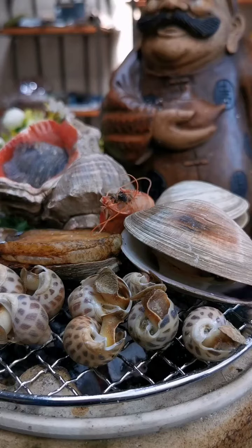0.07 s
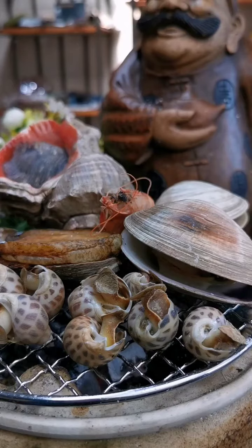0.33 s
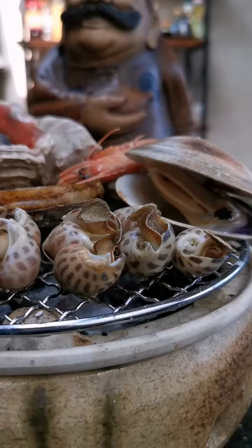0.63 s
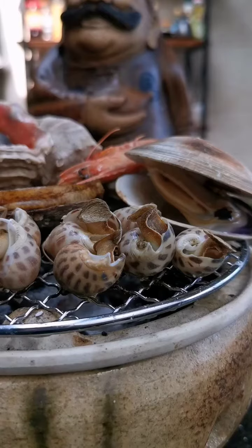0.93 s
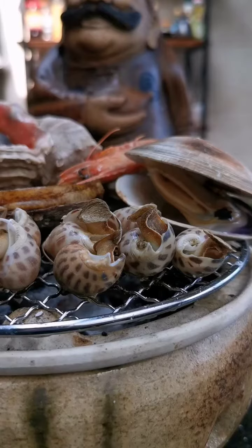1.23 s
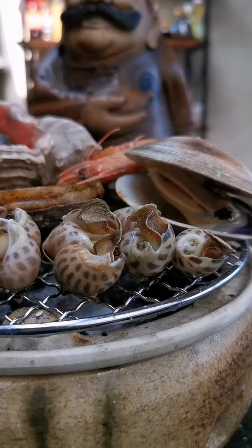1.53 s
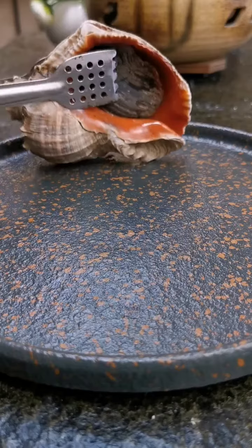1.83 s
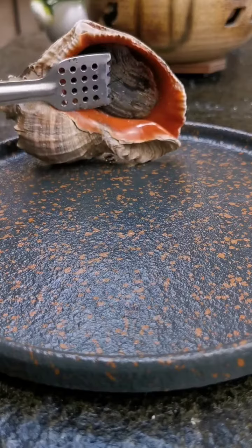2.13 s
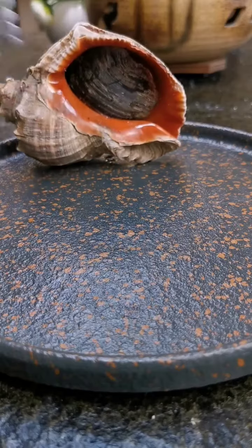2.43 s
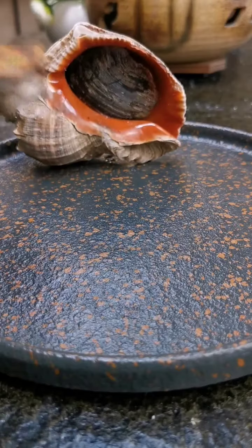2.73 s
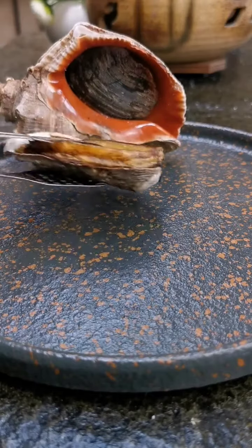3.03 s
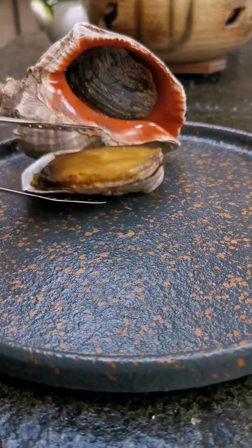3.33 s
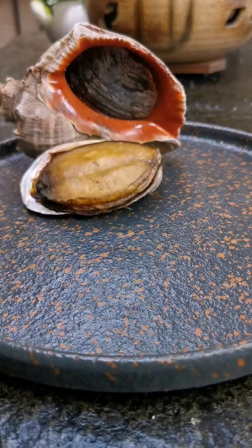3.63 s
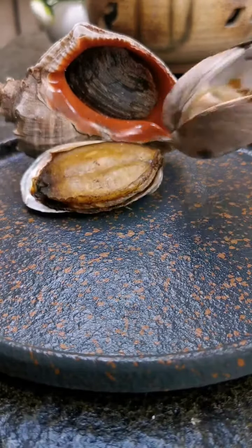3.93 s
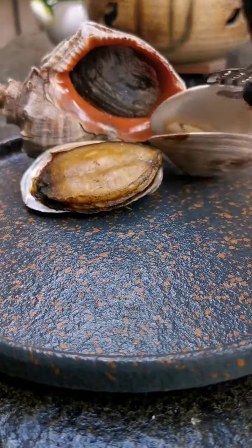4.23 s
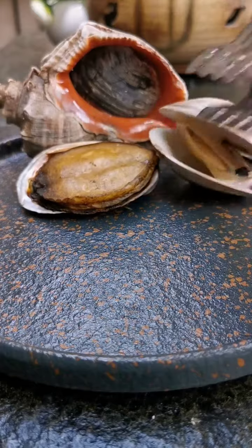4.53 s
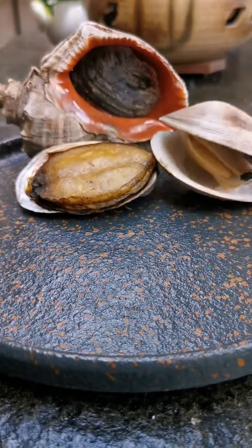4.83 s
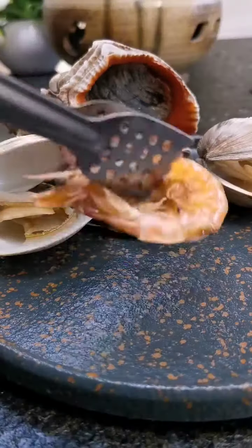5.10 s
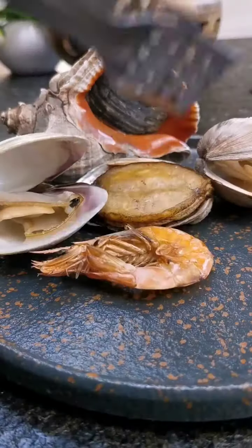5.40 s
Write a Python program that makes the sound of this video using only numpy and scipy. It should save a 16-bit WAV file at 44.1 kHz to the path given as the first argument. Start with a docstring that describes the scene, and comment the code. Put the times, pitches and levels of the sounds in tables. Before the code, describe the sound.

Seashells clack, ring and scrape on a stoneware plate as steel tongs serve shellfish, ending with a prawn's small wet crunch.

```python
"""In a hard-walled yard, steel tongs serve grilled shellfish onto a stoneware plate, heard from close by.
After a faint sizzle and a pop from the grill, a whelk, an abalone and clams clack down, ring, rock and
scrape; a prawn lands wetly. Impacts excite the damped modes of shell and plate, sliding contacts rasp by
stick-slip friction, and the yard echoes and booms. The sound fades out briefly between the servings."""
import sys
import numpy as np
from scipy import signal
from scipy.fft import rfft, irfft, next_fast_len
from scipy.io import wavfile
from scipy.ndimage import map_coordinates

SR = 44100
rng = np.random.default_rng(int(sys.argv[2]) if len(sys.argv) > 2 else 0)


def to_wav(sig):
    """Store sig (one row per channel, or 1-D mono) as 16-bit WAV at the path in sys.argv[1].

    Samples outside -1..1 are clipped; the rate is SR.
    """
    pcm = np.clip(np.atleast_2d(sig), -1, 1) * 32767
    pcm = np.round(pcm).astype(np.int16)
    wavfile.write(sys.argv[1], SR, pcm.T)  # frames by channels


N = 249606

# Sharp clacks. Each row: start in seconds, relative level in dB, kind of clack.
# The last two "whelk" rows are wall echoes of its crash. A "held" shell is damped by the tongs.
# The first "tip" is a shell popping on the grill; the others are ticks of the tongs' steel edge.
CONTACTS = [(.2754, -30.5, "tip"), (1.7212, -5.5, "whelk"), (1.7264, -5, "whelk"), (1.731, -4, "whelk"),
            (1.7345, -6.5, "whelk"), (1.7624, -18, "whelk"), (1.8043, -20.5, "whelk"),
            (2.0005, -25, "whelk spine"), (2.1265, -18.5, "whelk spine"), (2.2958, -37, "tip"),
            (2.4825, -26, "tongs"), (3.2301, -4, "abalone"), (3.2786, -18, "held"), (3.2904, -19.5, "held"),
            (3.3255, -16.5, "held"), (3.3342, -13, "held"), (3.3478, -5.5, "abalone"),
            (3.4195, -16.5, "held"), (3.42, -14, "abalone rim"), (3.595, -22.5, "tip"),
            (3.655, -31, "abalone rim"), (3.689, -39.5, "held"), (3.7349, -13.5, "abalone rim"),
            (3.8661, -13.5, "abalone rim"), (4.0875, -5, "clam lid"), (4.1918, -2, "clam cup"),
            (4.4982, -18, "clam rib"), (4.508, -11.5, "tip"), (4.528, -22, "clam rib"), (4.592, -15, "tip"),
            (4.615, -24.5, "clam rib"), (4.6385, -16, "clam rib")]
# Dull, hollow sounds. Each row: start in seconds, relative level in dB, the food they belong to.
# The "clam" rows are the yard's bloom after the lid's clack; the others are knocks of the food itself.
KNOCKS = [(2.0005, -28, "whelk"), (2.011, -24, "whelk"), (2.045, -29.5, "whelk"), (2.127, -27.5, "whelk"),
          (2.5335, -28.5, "whelk"), (3.595, -32, "abalone"), (3.807, -36.5, "abalone"), (4.11, -29, "clam"),
          (4.129, -26.5, "clam"), (5.354, -33, "prawn")]
# Booms of the yard after heavy landings. Each row: start in seconds, relative level in dB, what landed.
BOOMS = [(1.76, -33.5, "whelk"), (2.001, -42, "whelk"), (2.533, -48, "whelk"), (4.223, -44, "clam"),
         (5.36, -50, "prawn")]
# Modes of the plate and low resonances of the yard.
# Each row: frequency in Hz, relative level in dB, T60 in seconds.
PLATE_MODES = [(405, -11, .55), (425, -11, .6), (473, -11, .6), (598, -7, .7), (731, -15, .6),
               (862, -15, .5), (1432, -12, .36), (2241, 1, .5), (2349, -2, .4), (2448, 1, .58),
               (2938, -7, .45), (4123, 3, .38), (4576, -4, .28), (4601, -9, .4), (5779, -19, .45),
               (6352, -10, .4), (7870, -19, .2), (8872, -8, .4), (10330, -24, .44)]
YARD_MODES = [(81.36, -9, 1.0), (126.6, -8.5, 0.68), (166.6, -4, 1), (212.96, 2.5, 0.72), (240.5, -2, 0.6)]
def whelk():
    """Impact excitation: the whelk crashes down and tips over; the plate rings, the yard answers."""
    crash_and_echoes, spines = rows(CONTACTS, "whelk"), rows(CONTACTS, "whelk spine")
    landing, tumbles, booms = crash_and_echoes[:1], rows(KNOCKS, "whelk"), rows(BOOMS, "whelk")
    return (clacks(crash_and_echoes, bands_db=(-8, -6.5, -9, -34.5), room_db=-6.5, left_db=1)
            + rings(landing, PLATE_MODES, ring_db=-18.5, room_db=0, left_db=-0.5, flutter_db=5)
            + rings(tumbles, PLATE_MODES, ring_db=-24.5, room_db=-17, left_db=1, flutter_db=4.5)
            + clacks(spines, bands_db=(3, -20, -29.5, -35.5), room_db=-18, left_db=6.5)
            + knocks(tumbles, t60=0.32, octave_db=-4, left_db=0.3, room_db=-17.5)
            + rings(booms, YARD_MODES, ring_db=3.5, room_db=-8, left_db=1, octave_db=-6))


# Modes of the abalone shell. Each row: frequency in Hz, relative level in dB, T60 in seconds.
ABALONE_MODES = [(938, 14, 0.013), (1657, 5, 0.045), (1574, -9.5, .3), (2993, 17, 0.032),
                 (4608, 11.5, 0.079), (4680, 1, 0.053), (7140, -19.5, 0.14)]
def abalone():
    """Free vibration of a thin shell: the abalone cracks down twice, then settles with lighter taps."""
    blows, taps = rows(CONTACTS, "abalone"), rows(CONTACTS, "abalone rim")
    return (clacks(blows, bands_db=(-14, -7.5, -8, -24.5), room_db=-4, left_db=2.5)
            + clacks(taps, bands_db=(-16, -8.5, -15.5, -30), room_db=-0.5, left_db=2)
            + rings(blows + taps, ABALONE_MODES, ring_db=-15, room_db=-19, left_db=2, scatter_db=1.6)
            + knocks(rows(KNOCKS, "abalone"), t60=0.064, octave_db=10, left_db=1.7, room_db=-11.5))


# Modes of the clam struck on its lid, its cup and its ribs.
# Each row: frequency in Hz, relative level in dB, T60 in seconds.
LID_MODES = [(1465, -2.5, 0.023), (2170, 5.5, 0.019), (3144, -20, 0.1), (4100, 4, 0.029), (4160, -8, 0.17),
             (10160, -16.5, 0.17), (10740, -19, 0.19)]
CUP_MODES = [(1566, 7.5, 0.025), (2364, -3.5, 0.049), (2964, 10, 0.016), (3910, -13.5, 0.071),
             (4586, 0.5, 0.035), (5771, -15, 0.072)]
RIB_MODES = [(436.7, 0, 0.12), (500, -6.5, 0.13), (609, -9.5, 0.1), (843, 5, 0.051), (1628, 6.5, 0.023),
             (2440, -9, 0.17), (2970, 1.5, 0.022), (4000, -12, 0.097)]
def clam():
    """The point of impact selects the modes: the open clam lands on lid, then cup, then rocks on ribs."""
    lid, cup = rows(CONTACTS, "clam lid"), rows(CONTACTS, "clam cup")
    ribs, yard_bloom = rows(CONTACTS, "clam rib") + rocking(), rows(KNOCKS, "clam")
    return (clacks(lid, bands_db=(-20, -9, -16, -28), room_db=-5.5, left_db=-2.5)
            + rings(lid, LID_MODES, ring_db=-9.5, room_db=-17, left_db=1, scatter_db=6.6)
            + clacks(cup, bands_db=(-26.5, -6, -7, -24.5), room_db=-13, left_db=1.5)
            + rings(cup, CUP_MODES, ring_db=-11.5, room_db=-12.5, left_db=5, scatter_db=4.2)
            + rings(cup, PLATE_MODES, ring_db=-31, room_db=-3, left_db=0, octave_db=-3, flutter_db=3)
            + clacks(ribs, bands_db=(-7, -7.5, -18.5, -30), room_db=-9.5, left_db=2.5)
            + rings(ribs, RIB_MODES, ring_db=-7, room_db=-11, left_db=2, scatter_db=1.2)
            + knocks(yard_bloom, t60=0.29, octave_db=1, left_db=1.8, room_db=-7.5)
            + rings(rows(BOOMS, "clam"), YARD_MODES, ring_db=3, room_db=-8, left_db=3.5, octave_db=2.5))


def rocking(start_s=4.7165, first_swing_s=0.0315, shrink=0.69, count=4, db=-26):
    """Damped rocking: the intervals between rib contacts shrink in geometric progression."""
    swings = first_swing_s * shrink ** np.arange(count)
    return [(s, db) for s in start_s + np.cumsum(swings) - swings]


# Swells of rough noise. Each row: start in seconds, length in seconds, relative level in dB, texture.
# Two are reverberation: a faint hiss after a tick (3.608 s) and a wash after the clam's clack (4.222 s).
# The others are strokes over the glaze or a shell.
RASPS = [(.268, .032, -45.5, "shell"), (2.286, .087, -40.5, "steel"), (2.312, 0.044, -42.5, "ridges"),
         (2.343, 0.014, -34, "ridges"), (2.475, 0.019, -38, "steel"), (3.26, .08, -33, "shell"),
         (3.417, .15, -37.5, "shell"), (3.5, 0.12, -32, "steel"), (3.608, .15, -43.5, "shell"),
         (4.222, .11, -41.5, "ridges"), (4.412, 0.036, -39, "shell"), (4.505, 0.078, -33, "steel"),
         (5.46, 0.11, -49, "flesh")]
def tongs():
    """Friction and impact: tongs grip, tick and drag; with them come a grill pop and two reverb tails."""
    pop_and_ticks = rows(CONTACTS, "tip")
    rasps_and_wash, drags_and_hiss = rows(RASPS, "ridges"), rows(RASPS, "shell")
    return (clacks(rows(CONTACTS, "held"), bands_db=(-2, 2, -4.5, -20.5), room_db=-21.5, left_db=3)
            + clacks(pop_and_ticks, bands_db=(-18, -12.5, -11.5, -10.5), room_db=-15, left_db=1)
            + plate_ping()
            + rasps(rows(RASPS, "steel"), bands_db=(-14, -8, 3.5, -5), room_db=-8.5)
            + rasps(rasps_and_wash, bands_db=(-22.5, -3, 6, -20.5), room_db=-8.5)
            + rasps(drags_and_hiss, bands_db=(4, -6, -3.5, -7), room_db=-1.5))


# High modes of the plate. Each row: frequency in Hz, relative level in dB, T60 in seconds.
HIGH_PLATE_MODES = [(2220, -13, 0.39), (2900, -12, 0.18), (4560, 1, 0.14), (5820, -4, 0.17),
                    (7830, -6, 0.091), (8800, -13.5, 0.2), (9980, -10.5, 0.27), (12060, -12, 0.12)]
def plate_ping():
    """Free vibration: a click, and a bright, high ring of the plate."""
    click = rows(CONTACTS, "tongs")
    return (clacks(click, bands_db=(-0.5, -19, -23, -14.5), room_db=2, left_db=5.5)
            + rings(click, HIGH_PLATE_MODES, ring_db=-1, room_db=-22, left_db=1.5, scatter_db=2.5))


def prawn():
    """Soft, damped impact: the prawn lands in a wet crunch, plops and squelches as it settles."""
    crunch = crunches(room_db=-15.5)
    squelch = rasps(rows(RASPS, "flesh"), bands_db=(-27, -0.5, -4.5, -26), room_db=-17, grit_db=9.5)
    plop = knocks(rows(KNOCKS, "prawn"), t60=0.059, octave_db=8.5, left_db=1, room_db=-12)
    boom = rings(rows(BOOMS, "prawn"), YARD_MODES, ring_db=-4, room_db=-34, left_db=1.5, octave_db=6)
    return crunch + squelch + plop + boom


# Bursts of wet cracks. Each row: start in seconds, relative level in dB, T60 in seconds.
CRUNCHES = [(5.277, -46, 0.044), (5.303, -41, 0.25), (5.3272, -22, .025), (5.340, -22, 0.083),
            (5.3455, -13, 0.01), (5.349, -30, 0.18)]
# Spectrum of the cracks. Each row: frequency in Hz, relative level in dB.
CRUNCH_SPECTRUM = [(200, -15.5), (450, -15.5), (900, -9.5), (1500, -11.5), (2400, 0), (4000, -5.5),
                   (4800, 2), (6200, -4.5), (8200, -8.5), (12000, -13.5), (16000, -21.5)]
def crunches(room_db, cracks_per_s=3000):
    """Shot noise: the prawn's legs and thin shell crumple in decaying showers of tiny random cracks."""
    out, t = np.zeros((2, N)), clock(0.17)
    for s, db, t60 in CRUNCHES:
        cracks = unit((rng.random((3, len(t))) < cracks_per_s / SR) * rng.standard_normal((3, len(t))))
        envelope = amp(-60 * t / t60)
        shower = unit(cracks * envelope) * np.sqrt(np.mean(envelope ** 2))
        force = stereo(shower[0], shower[1:], spread=0.74)
        burst = coloured(force, lambda hz: along(CRUNCH_SPECTRUM, hz) + 7)
        add(out, s, with_room(amp(db) * burst, room_db))
    return out


# Spectrum common to clacks and rasps. Each row: frequency in Hz, relative level in dB.
CONTACT_SPECTRUM = [(40, -39.5), (200, -23), (450, -11), (800, 2), (1250, -5.5), (2000, -1), (3000, 3.5),
                    (3600, -4.5), (4600, -2), (5600, -7.5), (8000, -3), (11000, -6.5), (16000, -17)]
def contact_colour(bands_db):
    """Each contact point favours other resonances: a dB curve weighted in four bands, randomly rippled."""
    knock, clack, edge, tick = bands_db
    weights = [(700, knock + 10), (1600, clack + 8.5), (4800, edge + 5), (8000, tick + 6)]
    spot_db = np.minimum(4.5 * rng.standard_normal(SR // 100), 3)  # notches, but no peak that would ping

    def curve(hz):
        ripple = map_coordinates(spot_db, [hz / 260], mode="mirror") * np.minimum(hz / 4000, 1)
        return along(CONTACT_SPECTRUM, hz) + along(weights, hz) + ripple
    return curve


def impact_force(t, t60, push_db, chatter_db, spread):
    """Transient excitation: one impulse, then a chatter of exponentially decaying noise."""
    chatter = rng.standard_normal((3, len(t))) * amp(-60 * t / t60)
    chatter *= amp(chatter_db) / np.linalg.norm(chatter, axis=1, keepdims=True)
    return stereo(amp(push_db) * (t == 0)) + stereo(chatter[0], chatter[1:], spread)


def clacks(blows, bands_db, room_db, left_db):
    """Source and filter: a brief, sharp excitation takes on the colour of shell or steel."""
    out, t = np.zeros((2, N)), clock(0.1)
    for s, db in blows:
        force = impact_force(t, t60=0.028, push_db=-3, chatter_db=-5, spread=1)
        hit = 20 * amp(db) * coloured(force, contact_colour(bands_db))
        add(out, s, with_room(panned(hit, left_db), room_db))
    return out


# Hollow resonances. Each row: frequency in Hz, bandwidth in Hz, relative level in dB.
HOLLOW_RESONANCES = [(430, 70, 7), (538, 9.6, 6.5), (743, 26, 2.5), (796, 94, 0.5), (1022, 53, 2),
                     (1566, 130, -10)]
def knocks(blows, t60, octave_db, left_db, room_db):
    """Resonant filtering: a push and its rumble sound through hollow resonances, with a spectral tilt."""
    def body_db(hz):
        power = sum(amp(db) ** 2 * (hz * width) ** 2 / ((centre ** 2 - hz ** 2) ** 2 + (hz * width) ** 2)
                    for centre, width, db in HOLLOW_RESONANCES)
        power /= 1 + (hz / 2000) ** 4  # low-pass
        return 10 * np.log10(1e-7 + power) + octave_db * np.log2(np.clip(hz, 200, 1600) / 600)

    out, t = np.zeros((2, N)), clock(0.42)
    for s, db in blows:
        knock = coloured(impact_force(t, t60, push_db=-4, chatter_db=0, spread=0.19), body_db)
        knock *= amp(db) / np.sqrt(np.mean(knock[:, t < 0.015] ** 2))  # the onset sets the level
        add(out, s, with_room(panned(knock, left_db), room_db))
    return out


def rings(blows, modes, ring_db, room_db, left_db, octave_db=0, scatter_db=3, flutter_db=0):
    """Modal superposition: each blow starts damped sinusoids that radiate unequally to left and right."""
    out, t = np.zeros((2, N)), clock(0.79)
    rattles = t[::SR // 140]  # a loose shell touches 140 times a second, making the modes flutter
    arrival = t - np.array([[0], [LEFT_LEAD_SAMPLES / SR]])
    attack = 1 - np.exp(-t / 0.00099)
    for s, db in blows:
        ring = np.zeros((2, len(t)))
        for hz, mode_db, t60 in modes:
            chance = rng.standard_normal((2, 2))  # a phase and a level for each channel
            phase = 2 * np.pi * hz * arrival + chance[:, :1] * min(hz / 6000, 1)
            tilt_db = octave_db * np.log2(hz / modes[0][0])
            level_db = db + ring_db + mode_db + tilt_db + scatter_db * chance[:, 1:]
            flutter = flutter_db * np.interp(t, rattles, rng.standard_normal(len(rattles)))
            ring += amp(level_db + flutter - 60 * t / t60) * np.sin(phase)
        add(out, s, with_room(panned(ring * attack, left_db), room_db))
    return out


def rasps(swells, bands_db, room_db, grit_db=3.5, grains_per_s=700):
    """Amplitude modulation: noise swells in uneven grains, as in stick-slip friction or a rough echo."""
    out = np.zeros((2, N))
    for s, length, db in swells:
        t = clock(length)
        grains = rng.standard_normal(SR // 50)
        grit = amp(grit_db * np.interp(t, np.arange(len(grains)) / grains_per_s, grains))
        swell = np.abs(np.sin(np.pi * t / length)) ** 0.5
        noise = unit(rng.standard_normal((3, len(t))) * grit * swell)
        rough = np.pad(stereo(noise[0], noise[1:], spread=0.87), ((0, 0), (0, SR // 100)))
        add(out, s, with_room(amp(db) * coloured(rough, contact_colour(bands_db)), room_db))
    return out


# Likeness of the two channels in the yard. Each row: frequency in Hz, correlation from -1 to 1.
COHERENCE = [(60, 0.93), (290, 0.89), (640, 0.41), (1410, -0.14), (7000, -0.0068)]
def mid_side_gains(hz):
    """Spatial coherence: the ratio of mid to side makes a diffuse field nearly mono in the bass."""
    angle = np.arccos(np.clip(along(COHERENCE, hz), -1, 1)) / 2
    return np.array([np.cos(angle), np.sin(angle)])


# Reverberation of the yard. Each row: frequency in Hz, T60 in seconds.
YARD_T60 = [(100, 1.0), (500, 0.81), (2500, 0.52), (5000, 0.6), (10000, 0.58), (16000, 0.69)]
def with_room(x, room_db, wall_delay_s=0.031, early_db=-13):
    """Reverberation by convolution: thin early scatter, then the full decaying tail from the walls."""
    hz, t, spectra = signal.stft(rng.standard_normal((2, SR)), SR, nperseg=256)
    decay = amp(-60 * t / along(YARD_T60, hz)[:, None])
    mid, side = signal.istft(spectra * decay * mid_side_gains(hz)[..., None], SR, nperseg=256)[1]
    early = np.arange(len(mid)) / SR < wall_delay_s
    tail = np.array([mid + side, mid - side]) * np.where(early, amp(early_db), 1)
    wet = signal.fftconvolve(x[:1], tail / np.linalg.norm(tail[0]), axes=1) * amp(room_db)
    wet[:, :x.shape[1]] += x
    return wet


def air(spectrum, db, crackle_db, pops_per_s=40):
    """Stationary noise: a wide steady hiss, with random pops of juice in the treble."""
    hz = np.fft.rfftfreq(N, 1 / SR)
    pops = unit((rng.random((2, N)) < pops_per_s / SR) * rng.standard_normal((2, N)))
    noise = rfft(rng.standard_normal((2, N))) + amp(crackle_db) * rfft(pops) * hz / (hz + 3000)
    gains = mid_side_gains(hz)
    mid, side = irfft(noise * amp(along(spectrum, hz)) * gains / gains[0], N)
    return amp(db) * np.array([mid + side, mid - side]) / np.std(mid)


# Steady air beside the grill, a step back from it, and at the plate.
# Each row: frequency in Hz, relative spectral density in dB.
GRILL_NEAR = [(22, -25), (38, 2), (125, -2), (399, -13.5), (476, -14), (613, -13), (1020, -14),
              (1490, -24.5), (2060, -19.5), (6600, -25.5), (16000, -33.5)]
GRILL_FAR = [(22, -16), (38, 0), (92, -3.5), (142, -8), (207, -4), (266, -13.5), (527, -12.5), (967, -17.5),
             (1040, -17.5), (1560, -24), (4880, -27.5), (12700, -34), (16000, -36)]
YARD_AIR = [(22, -32), (38, 4), (54, 0), (70, -18), (92, -2.5), (145, -9.5), (247, -10.5), (389, -15),
            (732, -15), (1240, -25.5), (2530, -26.5), (5820, -35.5), (14800, -41), (16000, -51)]
def background():
    """Ambient noise depends on position: the air at three places in turn, switched during silences."""
    t = np.arange(N) / SR
    places = [t < SILENCES[0][1], t < SILENCES[1][0], t >= SILENCES[1][0]]
    airs = [air(GRILL_NEAR, db=-49.5, crackle_db=-11),
            air(GRILL_FAR, db=-54, crackle_db=-12),
            air(YARD_AIR, db=-50.5, crackle_db=-18)]
    return np.select(places, airs)


LEFT_LEAD_SAMPLES = 8
def stereo(x, scattered=0, spread=0):
    """Time-of-arrival difference: x reaches the left first; spread is the scattered share of power."""
    direct = np.array([x, np.pad(x, (LEFT_LEAD_SAMPLES, 0))[:len(x)]])
    return np.sqrt(1 - spread) * direct + np.sqrt(spread) * scattered


def panned(x, left_db):
    """Level difference: the left channel gains left_db and the right loses as much."""
    return x * amp([[left_db], [-left_db]])


def coloured(x, curve):
    """Minimum-phase filtering: a causal response whose gain in dB is curve(Hz)."""
    size = 2 * next_fast_len(x.shape[-1] // 2 + 2048)
    cepstrum = irfft(np.log(amp(curve(np.fft.rfftfreq(size, 1 / SR)))), size)
    cepstrum[1:size // 2] *= 2
    cepstrum[size // 2 + 1:] = 0
    return irfft(rfft(x, size) * np.exp(rfft(cepstrum)), size)[..., :x.shape[-1]]


def amp(db):
    """Amplitude ratio of a level in dB."""
    return 10 ** (np.asarray(db) / 20)


def unit(x):
    """Normalisation to an RMS of one."""
    return x / np.sqrt(np.mean(x ** 2) + 1e-20)


def along(points, hz):
    """Interpolation of (Hz, value) points on a logarithmic frequency axis."""
    frequencies, values = np.transpose(points)
    return np.interp(np.log(hz + 1), np.log(frequencies + 1), values)


def clock(seconds):
    """Sample times in seconds."""
    return np.arange(int(seconds * SR)) / SR


def rows(table, thing):
    """The events of a table that belong to one thing, without its name."""
    return [row[:-1] for row in table if row[-1] == thing]


def add(track, s, sound):
    """Superposition: a sound joins the track at s seconds and stops by the end of the next silence."""
    start = max(round(s * SR), 0)
    end = min([round(to * SR) for _, to in SILENCES if to > s] + [N, start + sound.shape[1]])
    track[:, start:end] += sound[:, :end - start]


def scene():
    """Linear superposition: the pressures of shellfish, tongs and air add."""
    return whelk() + abalone() + clam() + tongs() + prawn() + background()


# Near-silent gaps between the servings. Each row: start in seconds, end in seconds.
SILENCES = [(.395, .655), (1.665, 1.69), (2.725, 2.748), (3.905, 3.922), (4.94, 4.962)]
# Unequal colour of the two channels. Each row: frequency in Hz, left minus right level in dB.
CHANNEL_BALANCE = [(60, -0.5), (130, 6.5), (300, -1), (1000, 2), (2200, -1.5), (4400, -2), (8000, -0.5)]
def record(dry, fade_s=0.036, floor_db=-42, top_hz=16200):
    """Filtering and gain: unequal channel colour, fades around each silence, clipping, a band limit."""
    t, hz = np.arange(N) / SR, np.fft.rfftfreq(N, 1 / SR)
    to_silence_s = np.min([np.maximum(start - t, t - end) for start, end in SILENCES], axis=0)
    gain = np.maximum(np.clip(to_silence_s / fade_s, 0, 1) ** 1.65, amp(floor_db))
    balance = amp(along(CHANNEL_BALANCE, hz) * np.array([[0.5], [-0.5]]))
    channels = irfft(rfft(dry) * balance, N)
    clipped = np.clip(channels * gain, -1, 1)
    return irfft(rfft(clipped) * (hz < top_hz), N)


dry = scene()
out = record(dry)
to_wav(out)
```